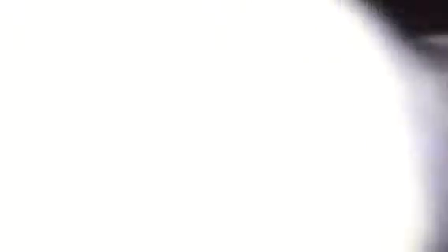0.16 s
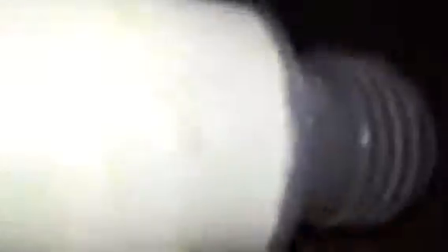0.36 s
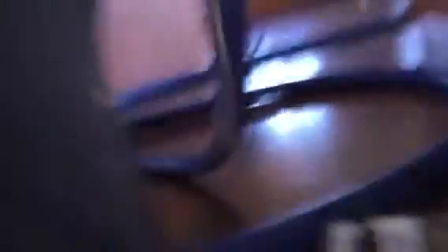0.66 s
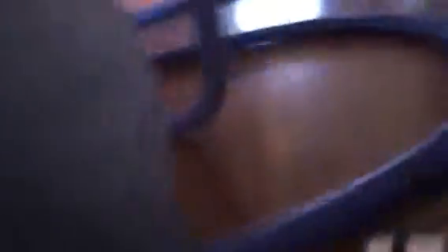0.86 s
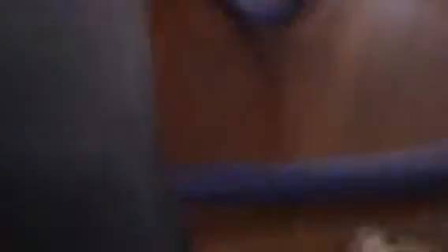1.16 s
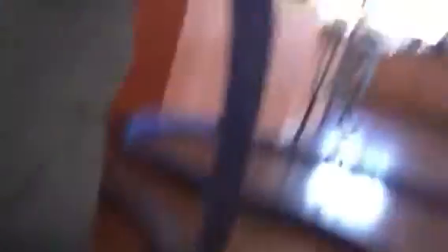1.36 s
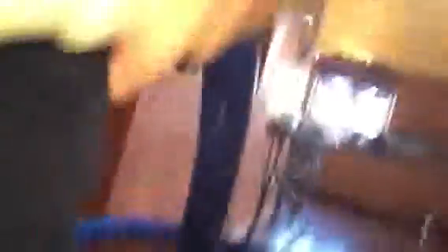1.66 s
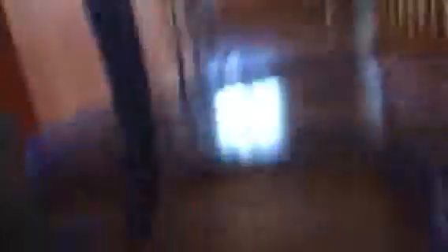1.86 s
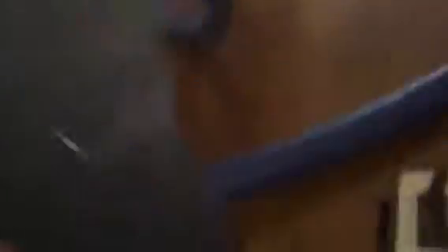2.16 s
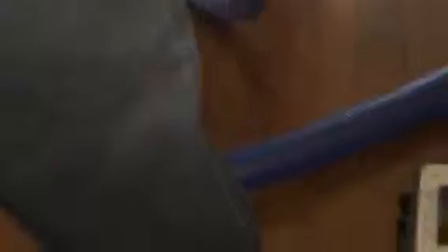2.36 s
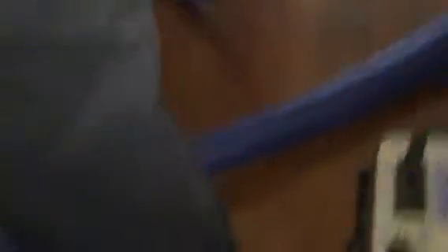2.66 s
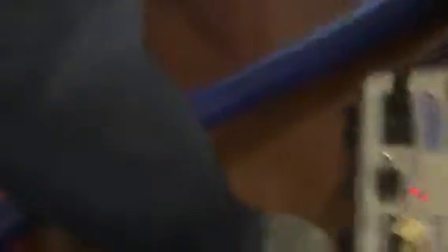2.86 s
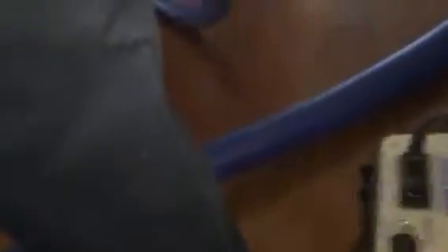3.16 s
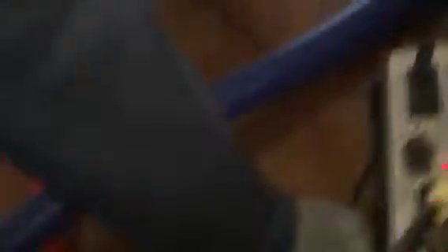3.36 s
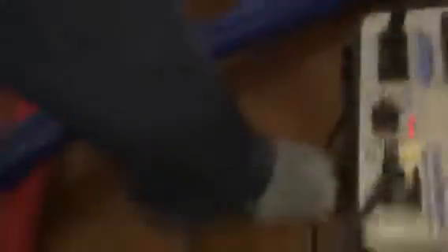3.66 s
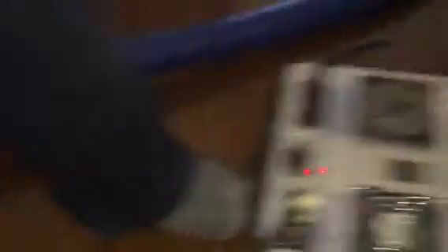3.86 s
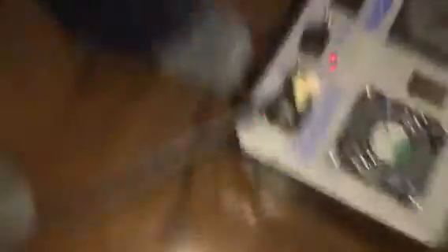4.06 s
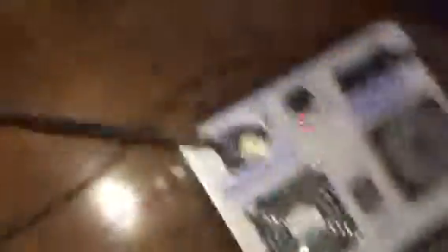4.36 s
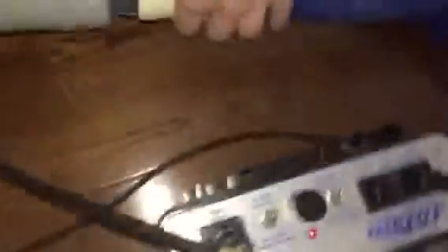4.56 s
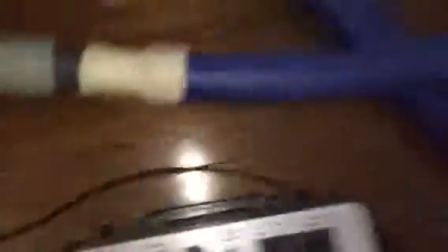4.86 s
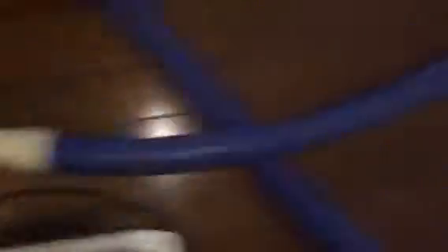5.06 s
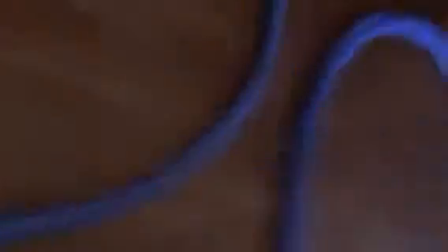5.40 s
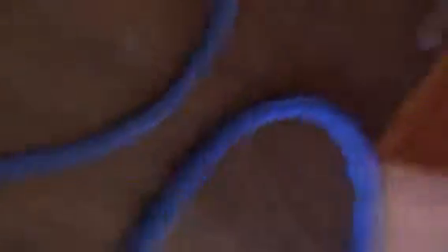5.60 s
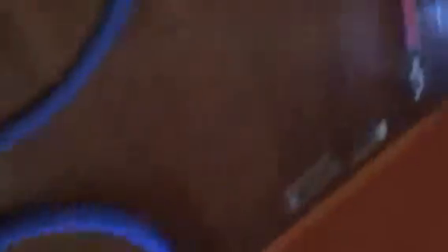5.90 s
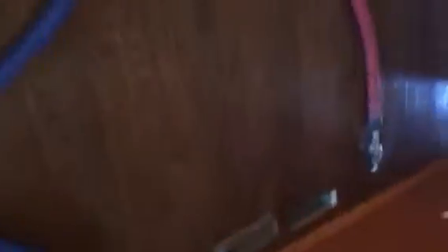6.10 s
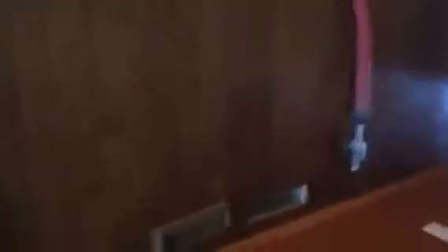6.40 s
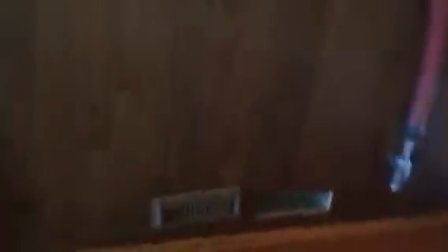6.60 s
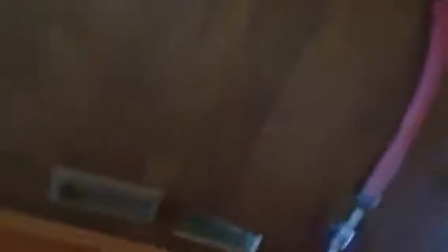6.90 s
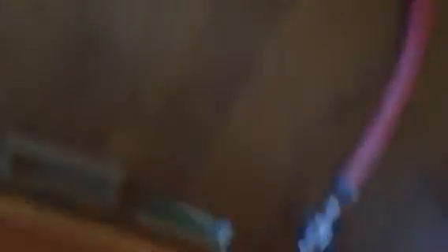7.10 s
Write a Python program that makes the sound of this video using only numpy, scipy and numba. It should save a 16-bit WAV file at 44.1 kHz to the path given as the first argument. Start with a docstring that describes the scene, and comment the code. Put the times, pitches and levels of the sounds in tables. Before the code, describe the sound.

Close to a phone microphone, a vacuum hose sucks air through a gap at a floor vent with a loud, swooshing hiss. The gap narrows, roars, squeals and slaps shut. A quieter, steady rush of air and a low blower drone fill the room, a faint whistle swells, and a few knocks sound on the wooden floor. The hiss then grows louder and brighter as the microphone nears an open vent.

```python
"""First comes a loud, swooshing hiss: a duct-cleaning vacuum hose sucks air through a gap at a floor
vent, close to a phone. The gap narrows, roars, squeals and slaps shut. A steadier rush of air and the
blower's drone go on in the room, an airy whistle swells, and a few knocks sound on the wooden floor.
Then the phone is carried to an open vent, whose hiss mixes with a sliding reflection off the wood.
The air sounds are shaped noise; a resonance is a pitch at which a hollow space likes to ring."""
import sys
import numpy as np
from scipy import signal
from scipy.fft import rfft, irfft
from scipy.io import wavfile
from scipy.ndimage import uniform_filter1d, minimum_filter1d, map_coordinates
from numba import njit

SR = 44100
rng = np.random.default_rng(int(sys.argv[2]) if len(sys.argv) > 2 else 0)


def persist_wave(psi):
    """Save psi, clipped to +-1, as 16-bit WAV."""
    counts = np.round(np.clip(psi, -1, 1) * 32767).astype(np.int16)
    wavfile.write(sys.argv[1], SR, np.atleast_2d(counts).T)


N = 319284
T = np.arange(N) / SR
HZ = np.maximum(np.arange(N // 2 + 1) * SR / N, 1)
SWING_S, SWING_LENGTH_S = 0.38, 0.26  # the hose swings away from the phone
SEAL_S, SEAL_FADE_S = 1.655, 0.013  # the gap seals
WALK_S = 4.82  # the walk to the open vent begins


# The hollow behind the gap. Each row: pitch in Hz, width in Hz, relative level in dB,
# fraction by which the pitch starts too low.
CAVITY_RINGS = [(288, 226, -15, 0), (1818, 355, -7.5, 0), (4260, 260, -8.5, 0.057),
                (5770, 350, -16.5, 0.026), (6830, 330, -15, .02)]
def cavity():
    """Air rings the hollow behind the gap, which comes up to pitch as the hose is pushed home."""
    loose = 1 - ease(0.06, 0.14)
    return sum(undb(db) * gliding(hz, width, 1 - flat * loose) for hz, width, db, flat in CAVITY_RINGS)


# The whoosh as the hose goes by. Each row: time in seconds, pitch in Hz, relative level in dB.
WHOOSH_PATH = [(0, 6500, 0), (0.09, 7450, -2), (0.18, 9300, 0), (0.28, 9000, 3), (0.35, 7400, -4),
               (0.41, 6170, 2), (0.48, 5500, -2), (0.56, 4200, -12), (0.7, 3000, -45)]
def whoosh():
    """A band of hiss rises and falls in pitch as the hose mouth passes the phone."""
    hz, db = curves(WHOOSH_PATH)
    return undb(db) * jet(hz, q=4.5)


# The reflection nearest the hose. Each row: time in seconds, delay in milliseconds.
HOSE_ECHO_DELAYS = [(0, .54), (.1, .5), (.18, .45), (.3, .45), (.41, .48), (.5, .75), (.67, 1.55),
                    (.86, 1.3), (1.0, .72), (1.3, .48)]
def hose_echoes(air):
    """Two surfaces reflect the hiss, strongly until the hose swings away; sliding delays swoosh."""
    lag_ms, = curves(HOSE_ECHO_DELAYS)
    lag_ms *= 1 + 0.025 * wander(40)  # the hose trembles
    strength = 0.1 + 0.44 * (1 - ease(SWING_S, SWING_LENGTH_S))
    first = bounced(air, lag_ms, dull_hz=8000)
    second = bounced(air, 1.56 * lag_ms, dull_hz=6000)
    return strength * (first + 0.32 * second)


# The tone of air churning in the gap. Each row: frequency in Hz, relative level in dB.
CHURN_COLOUR = [(120, -29), (200, -17), (331, -21), (740, -16), (1020, -6), (1400, -5.5), (2390, -4.5),
                (3230, -4), (4230, 1), (4920, -6), (6650, -1.5), (7700, -5), (9000, -3.5), (11000, -14.5),
                (14300, -41), (22000, -120)]
# Moments when the slit points at the phone. Each row: time in seconds, half length in seconds,
# change of the slit's hiss in dB, change of the whole suction sound in dB.
SLIT_FACINGS = [(0.59, 0.13, 5.5, 0.8), (1.32, 0.13, -3, 2)]
def suction():
    """Air tears through the gap at the hose mouth, surges once, and thins as the gap narrows and seals."""
    passing, surge, narrowing = bell(0.2, 0.35), bell(0.94, 0.16), ease(1.18, 0.39)
    churn_db = 3 + 3 * surge - 4 * passing - 5.5 * narrowing ** 2
    hiss_db = -3 - 18 * passing - 5.5 * narrowing ** 2
    hiss_db += sum(db * bell(s, width) for s, width, db, _ in SLIT_FACINGS)
    spray_db = -5 + 2.5 * surge - 5.5 * narrowing
    level_db = -23 + 3 * surge + sum(db * bell(s, width) for s, width, _, db in SLIT_FACINGS)
    air = cavity() + undb(churn_db) * noise(colour(CHURN_COLOUR))
    slit = jet(np.full(N, 2800.0), q=1.9) + undb(-3.5) * noise(resonance(hz=2400, width=130))
    air += undb(hiss_db) * slit + whoosh()
    air = near_walls(air + hose_echoes(air), strength=0.055, drift_ms=0.22)
    air = levelled(air, window=SR // 10)  # the gap's shape sets the tone, the flow sets the level
    spray = noise(colour([(7000, -24), (10500, -5), (12500, -2), (15000, 0), (16500, -23)]))
    air += undb(spray_db) * spray
    return air * undb(level_db + 0.5 * wander(29.86)) * release(SEAL_S, SEAL_FADE_S)


# The tone of the rush in the room. Each row: frequency in Hz, relative level in dB.
ROOM_COLOUR = [(150, -23), (260, -3.5), (330, -10), (639, -11), (732, -11), (1050, -8.5), (1200, -11),
               (1600, -10), (2120, -9), (2480, -10.5), (4400, -10.5), (5000, -11.5), (5700, -10.5),
               (7500, -17), (15000, -27.5)]
def room_air():
    """Moving air fills the room with a steady rush; a faint whistle in it swells after the seal."""
    whistle_db = -27 + 15.5 * bell(2.4, 0.54)
    return noise(colour(ROOM_COLOUR)) + undb(whistle_db) * noise(resonance(hz=5640, width=135))


# The treble dips as the phone turns. Each row: time in seconds, half length in seconds, change in dB.
TREBLE_DIPS = [(1.8, 0.4, -4), (3.1, 0.5, -0.5), (5.05, 0.52, -3)]
def rush():
    """The room's rush gives way to the open vent, growing louder and brighter as the phone nears it."""
    near, share = nearness(), vent_share()
    air = np.sqrt(share) * open_vent() + np.sqrt(1 - share) * room_air()
    air = near_walls(air, strength=0.085, drift_ms=0.14)
    treble = irfft(rfft(air) / (1 + (7500 / HZ) ** 8), N)
    body = unit(air - treble)
    treble_db = -37.5 + 8 * near + swells(TREBLE_DIPS) + 0.56 * wander(12)
    air = undb(-33.5 + 6.5 * near) * body + undb(treble_db) * levelled(treble, window=SR // 4)
    shield_db = -3.5 * (1 - ease(SWING_S, SWING_LENGTH_S))  # at first the hose mouth shields the phone
    return air * undb(shield_db + 0.33 * wander(10))


# The tone of the ducts' rumble. Each row: frequency in Hz, relative level in dB.
DUCT_COLOUR = [(24, -44), (40, -15), (60, 3), (76, -0.5), (97, 1.5), (135, 2), (183, -0.5), (260, 0),
               (340, -22), (570, -120)]
# Swells of the rumble. Each row: time in seconds, half length in seconds, rise in dB.
RUMBLE_SWELLS = [(0.3, 0.51, 4.5), (2.4, 0.2, 3.5), (4.2, 0.44, 3)]
def duct_rumble():
    """The blower rumbles through the ducts, a little less after the seal and on the walk away."""
    level_db = -45.5 + 2 * release(SEAL_S, SEAL_FADE_S) - 5 * nearness() + swells(RUMBLE_SWELLS)
    return noise(colour(DUCT_COLOUR)) * undb(level_db + 0.12 * wander(4.1))


# The blower's hum. Each row: pitch in Hz, base level in dB, waver in Hz, change at the open vent in dB.
BLOWER_TONES = [(269.5, -49.6, 2.2, -6), (1019, -54.6, 3.2, -12)]
# Duct resonances that the blower drives. Each row: pitch in Hz, width in Hz, base level in dB.
DUCT_RINGS = [(62.4, 6.9, -64), (95.5, 12, -54), (112, 8.9, -52.5), (224, 20, -55.5), (266, 16, -60)]
def blower():
    """The blower hums and rings the ducts, harder once the gap seals; it fades on the walk away."""
    away = vent_share()
    tones = 0
    for hz, db, waver_hz, away_db in BLOWER_TONES:
        phase = 2 * np.pi * np.cumsum(hz + waver_hz * wander(29.76)) / SR
        tones += np.sqrt(2) * np.sin(phase) * undb(db + away_db * away + 2 * wander(7))
    tones *= undb(2.5 * bell(4.15, 0.55))  # they stand out while the phone points at the floor
    drone = ringing(DUCT_RINGS) * undb(2 - 27 * away) + tones
    return drone * undb(-3.5 * release(SEAL_S, SEAL_FADE_S))


# Hard plastic hitting boards. Each row: pitch in Hz, relative level in dB, fade time in seconds.
CLACK_RINGS = [(600, -5, 0.0046), (1430, -9, 0.019), (1610, -3, .005), (1820, -2, .006), (2080, -5, .005),
               (4070, -2, .002)]
# Blows on the floor. Each row: start in seconds, thud level in dB, thud pitch in Hz,
# thud fade time in seconds, clack level in dB.
FLOOR_KNOCKS = [(1.255, -28, 230, 0.025, -60), (1.654, -18.5, 83, 0.02, -36), (4.246, -35, 150, 0.022, -60),
                (4.35, -34, 108, 0.068, -22.5), (4.369, -28.5, 166, 0.063, -58),
                (4.432, -32, 133, 0.06, -58), (4.468, -42, 170, 0.04, -31), (4.715, -35.5, 221, 0.032, -60),
                (5.454, -31, 96, 0.044, -64), (7.11, -40, 48, 0.032, -68)]
def knocks():
    """Each blow gives a short clack and a low thud from the floor and the duct under it."""
    t = T[:SR // 10]
    clack = sum(undb(db) * np.sin(2 * np.pi * hz * t) * np.exp(-t / fade) for hz, db, fade in CLACK_RINGS)
    out, tails = np.zeros(N), np.zeros(N)
    for s, thud_db, hz, fade_s, clack_db in FLOOR_KNOCKS:
        attack = 1 - release(s, 0.00074)
        out += undb(thud_db) * wavering(hz, 0.4 * hz) * attack * release(s, fade_s)
        start = int(s * SR)
        out[start:start + len(t)] += undb(clack_db) * clack[:N - start]
        tails += undb(clack_db - 9.5) * (T > s) * release(s, 0.033)  # boards and room prolong the clack
    return out + tails * noise(resonance(hz=1000, width=1500))


# Resonances of the closing gap. Each row: pitch in Hz, width in Hz, relative level in dB.
ROAR_RINGS = [(687, 950, -6.5), (3370, 450, -7), (5600, 460, -8), (11600, 8000, -2)]
def closing_roar():
    """The closing gap roars louder and shoots up in pitch; a last leak hisses until the rim settles."""
    shut_s, roar_hz, shut_hz, leak_db = 1.647, 2160, 4630, -24.5
    early_s = np.maximum(shut_s - T, 0)
    hz = roar_hz + (shut_hz - roar_hz) * np.exp(-early_s / 0.0095)
    level_db = np.where(T < shut_s, -16 - 55 * early_s, leak_db)
    flow = ease(1.492, 0.07) * release(shut_s + 0.032, 0.0059)
    flutter_db = 0.6 * wander(250)
    return unit(jet(hz, q=0.59) + ringing(ROAR_RINGS)) * undb(level_db + flutter_db) * flow


# The squeal of the last slit. Each row: pitch in Hz, width in Hz, relative level in dB.
SQUEAL_TONES = [(4140, 290, -2), (5100, 260, -5.5), (5500, 220, -8)]
def squeal():
    """The last slit squeals and spits for an instant; the hollow behind it whistles on briefly."""
    snap_s = 1.643
    spit = undb(-10.5) * noise(resonance(hz=9000, width=8000))
    tones = undb(-6.5) * unit(sum(undb(db) * wavering(hz, width) for hz, width, db in SQUEAL_TONES))
    after_ring = undb(-30) * wavering(hz=4100, width=140) * (T > snap_s) * release(snap_s, 0.05)
    return bell(snap_s, 0.0042) * (spit + tones) + after_ring


# The hollow box under the open vent. Each row: pitch in Hz, width in Hz, relative level in dB,
# fraction by which the pitch rises, loudest moment in seconds.
BOX_RINGS = [(1040, 280, -8.5, .1, 7.15), (1990, 330, -14.5, .08, 7.2), (5720, 380, -10.5, .09, 6.78),
             (6740, 300, -13.5, .04, 6.85), (8480, 760, -15, .04, 6.65)]
def vent_box():
    """Air rings the box under the vent; each ring swells and rises as the phone comes over it."""
    over = ease(6.65, 0.45)
    return sum(undb(db) * (0.35 + bell(s, 0.35)) * gliding(hz, width, 1 + rise * over)
               for hz, width, db, rise, s in BOX_RINGS)


# The tone of the open vent's hiss. Each row: frequency in Hz, relative level in dB.
OPEN_VENT_COLOUR = [(180, -43), (300, -26), (390, -19), (482, -25), (568, -9), (669, -4.5), (900, -3.5),
                    (1400, -2.5), (1940, 0.5), (3000, -1), (4500, -3), (5100, -1.5), (5600, -1.5),
                    (6730, -2), (7500, -5.5), (15000, -14)]
# Resonances of the pipe behind it. Each row: pitch in Hz, width in Hz, relative level in dB.
PIPE_RINGS = [(900, 98, -17), (3070, 140, -21), (4560, 110, -17)]
# Its edge hisses as the phone goes by. Each row: time in seconds, half length in seconds,
# relative level in dB.
EDGE_HISSES = [(5.2, 0.2, -10), (5.48, 0.12, -4), (5.9, 0.28, -4.5)]
# Its reflection off the wood. Each row: time in seconds, delay in milliseconds.
WOOD_ECHO_DELAYS = [(4.7, 1.42), (5.3, 1.21), (5.7, 1.08), (6.1, 1.03), (6.6, 1.06), (6.95, 1.04),
                    (7.24, 0.97)]
def open_vent():
    """Air hisses through the open vent, heard directly and off the wood beside it."""
    vent = vent_box() + noise(colour(OPEN_VENT_COLOUR)) + ringing(PIPE_RINGS)
    edge_gain = sum(undb(db) * bell(s, width) for s, width, db in EDGE_HISSES)
    vent += edge_gain * noise(resonance(hz=3240, width=1650))
    lag_ms, = curves(WOOD_ECHO_DELAYS)
    return unit(vent + 0.24 * bounced(vent, lag_ms, dull_hz=8000))


def nearness():
    """Progress of the walk to the open vent, from 0 towards 1, slowing on arrival."""
    return 1 - release(WALK_S, 1.47)


def vent_share():
    """How much of the rush comes from the open vent."""
    return 0.94 * ease(WALK_S, 0.65)


def undb(db):
    """Turn decibels into a gain to multiply by."""
    return 10 ** (np.asarray(db) / 20)


def unit(x):
    """Scale a sound to an average (rms) level of 1."""
    return x / np.sqrt(np.mean(x ** 2))


def levelled(x, window):
    """Hold the level near 1, averaging over a window of samples."""
    return x / np.sqrt(uniform_filter1d(x ** 2, window))


def bell(s, width_s):
    """A smooth rise to 1 at time s and a fall again."""
    return np.exp(-((T - s) / width_s) ** 2)


def ease(s, length_s):
    """A smooth step from 0 to 1 that starts at time s."""
    return np.sin(np.pi / 2 * np.clip((T - s) / length_s, 0, 1)) ** 2


def release(s, fade_s):
    """Stay at 1 until time s, then die away."""
    return np.exp(-np.maximum(T - s, 0) / fade_s)


def swells(table):
    """Add up smooth rises and dips, in dB."""
    return sum(db * bell(s, width) for s, width, db in table)


def curves(table):
    """Join each column's values with straight lines in time."""
    s, *columns = np.transpose(table)
    return [np.interp(T, s, column) for column in columns]


def wander(rate):
    """A smooth random wobble, about 1 in size, with rate new values a second."""
    hold = max(int(SR / rate), 1)
    held = np.repeat(rng.standard_normal(N // hold + 1), hold)
    return unit(uniform_filter1d(uniform_filter1d(held, hold), hold)[:N])


def noise(gain):
    """Noise of level 1, shaped by a gain for each frequency."""
    return unit(irfft(rfft(rng.standard_normal(N)) * gain, N))


def colour(points):
    """A gain for each frequency, drawn through (Hz, dB) points."""
    hz, db = np.transpose(points)
    return undb(np.interp(np.log(HZ), np.log(hz), db))


def resonance(hz, width):
    """A gain that peaks at one pitch and falls steeply on both sides."""
    return 1 / (1 + ((HZ ** 2 - hz ** 2) / (HZ * width * np.pi / 2)) ** 2)


def ringing(rings):
    """Churning air rings at several fixed pitches."""
    return sum(undb(db) * noise(resonance(hz, width)) for hz, width, db in rings)


@njit
def sweep(x, hz, q):
    """Let through a band around a moving pitch; a higher q makes it narrower."""
    out, band_state, low_state = np.empty(len(x)), 0., 0.
    for i in range(len(x)):
        step = np.tan(np.pi * hz[i] / SR)
        band = (band_state + step * (x[i] - low_state)) / (1 + step * (step + 1 / q))
        band_state = 2 * band - band_state
        low_state += 2 * step * band
        out[i] = band / np.sqrt(step)
    return out


def jet(hz, q):
    """The hiss of a slit, centred on a pitch that can move."""
    return unit(sweep(sweep(rng.standard_normal(N), hz, q), hz, q))


def gliding(hz, width, stretch):
    """Churning air rings at a pitch that is stretched over time."""
    return jet(hz * stretch, q=0.64 * hz / width)


def wavering(hz, width):
    """A tone of level 1 whose pitch wanders by about the given width."""
    return np.sqrt(2) * np.cos(np.angle(signal.hilbert(noise(resonance(hz, width)))))


def delayed(x, lag_ms):
    """The sound arrives later, over a path whose length may change."""
    return map_coordinates(x, [np.arange(N) - lag_ms * SR / 1000], order=2, mode="mirror")


def bounced(x, lag_ms, dull_hz):
    """A reflection off a rough surface, which scatters the treble."""
    return delayed(irfft(rfft(x) / (1 + (HZ / dull_hz) ** 2), N), lag_ms)


def near_walls(x, strength, drift_ms):
    """Reflections off floor, wall and legs slide as the phone moves and sound slightly hollow."""
    lags_ms = rng.uniform(1.487, 8.2, size=5)
    return unit(x + strength * sum(delayed(x, lag + drift_ms * wander(1.22)) for lag in lags_ms))


def scene():
    """All the sounds meet at one microphone, the same in both channels."""
    mix = suction() + closing_roar() + squeal() + rush() + duct_rumble() + blower() + knocks()
    return np.tile(mix, (2, 1))


# Fixed dips of the microphone's opening. Each row: frequency in Hz, width in Hz, change in dB.
MIC_DIPS = [(5030, 280, -3), (10490, 460, -4)]
def mic_opening(x):
    """The small opening in front of the microphone weakens two bands of treble."""
    dips_db = sum(db * np.exp(-((HZ - hz) / width) ** 2) for hz, width, db in MIC_DIPS)
    return irfft(rfft(x) * undb(dips_db), N)


# Brief dips in the treble. Each row: middle in seconds, half length in seconds, frequency in Hz,
# width in Hz, slide in Hz per second.
SLIDING_DIPS = [(0.21, 0.04, 4920, 380, 900), (0.35, 0.05, 5170, 200, 2200), (0.235, 0.08, 10480, 750, 400),
                (1.305, 0.09, 4950, 500, 1700)]
def sliding_dips(x):
    """Sound from straight ahead cancels in the microphone's opening; dips slide up as the hose swings."""
    for s, half_s, centre_hz, width, slide in SLIDING_DIPS:
        hz = centre_hz + slide * np.clip(T - s, -half_s, half_s)
        q = centre_hz / width
        for _ in range(3):  # each pass deepens the dip
            band = sweep(x, hz, q) * np.sqrt(np.tan(np.pi * hz / SR)) / q
            x = x - bell(s, half_s) * band
    return x


def gain_control(x, threshold_db, hold_s, slew_s):
    """A loud peak turns the volume down by up to 7 dB; it is held there, then let go."""
    level_db = 10 * np.log10(uniform_filter1d(x[0] ** 2, SR // 100) + 1e-12)
    cut_db = np.clip(threshold_db - level_db, -7, 0)
    half = int(hold_s * SR / 2)
    held_db = minimum_filter1d(cut_db, 2 * half + 1, origin=half)
    pole = np.exp(-1 / (slew_s * SR))
    return x * undb(signal.lfilter([1 - pole], [1, -pole], held_db))


def record(dry):
    """The phone adds its dips, tames loud peaks, and cuts the deepest bass and the highest treble."""
    bass_hz, top_hz = 38, 15270
    sound = np.array([sliding_dips(channel) for channel in mic_opening(dry)])
    sound = signal.sosfilt(signal.butter(2, bass_hz, "high", fs=SR, output="sos"), sound)
    sound = gain_control(sound, threshold_db=-14.5, hold_s=0.18, slew_s=0.04)
    sound = sound / (1 + (sound / 0.75) ** 4) ** 0.25  # round off the peaks
    return signal.sosfilt(signal.ellip(14, 0.1, 90, top_hz, fs=SR, output="sos"), sound)


dry = scene()
out = record(dry)
persist_wave(out)
```